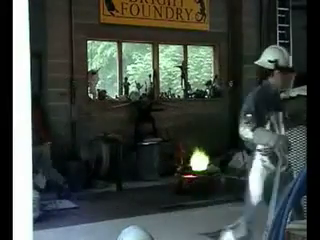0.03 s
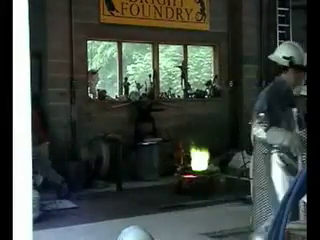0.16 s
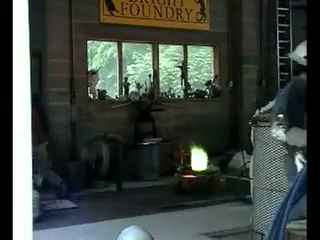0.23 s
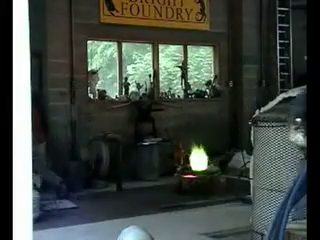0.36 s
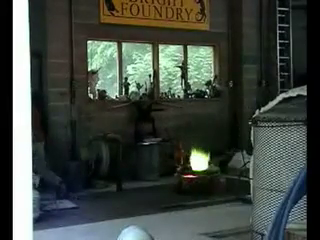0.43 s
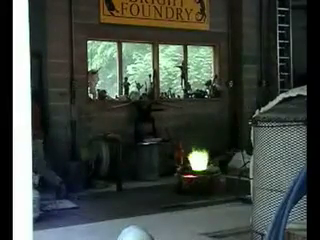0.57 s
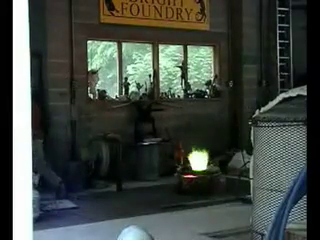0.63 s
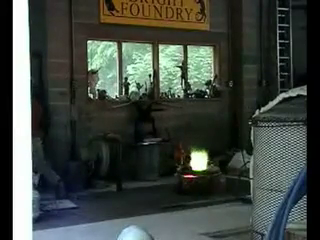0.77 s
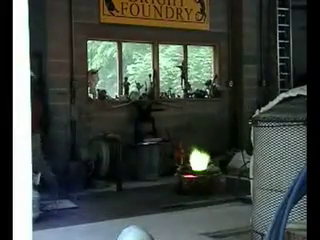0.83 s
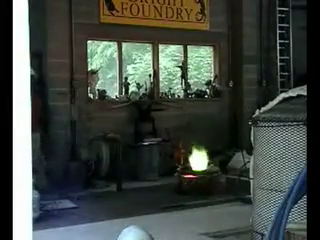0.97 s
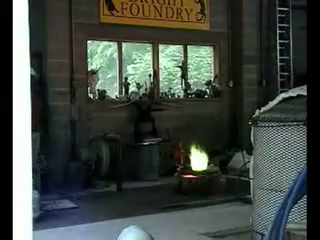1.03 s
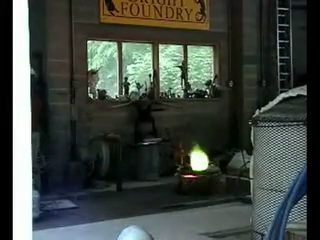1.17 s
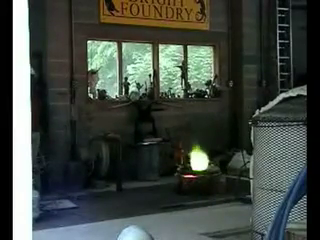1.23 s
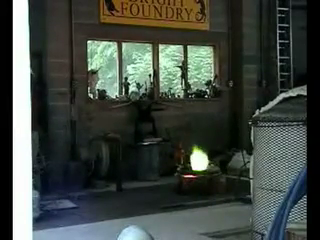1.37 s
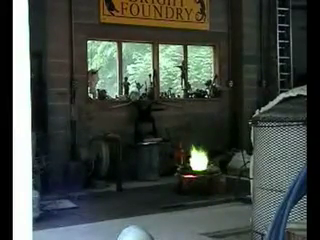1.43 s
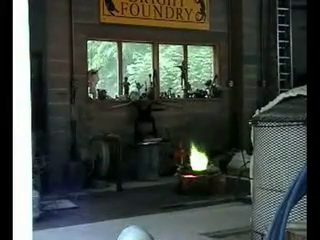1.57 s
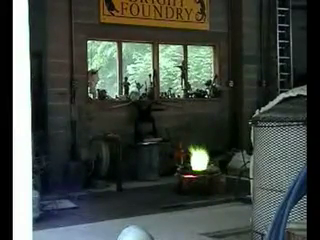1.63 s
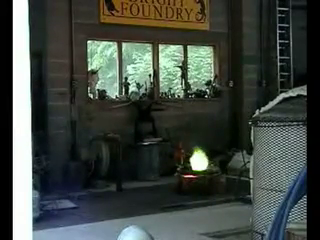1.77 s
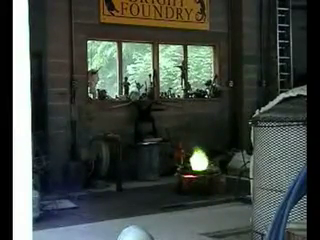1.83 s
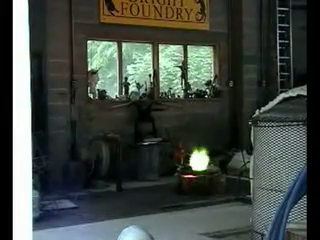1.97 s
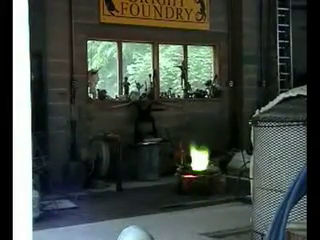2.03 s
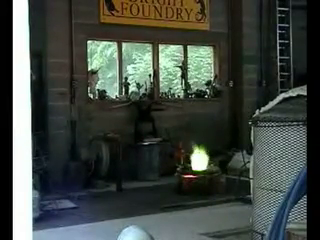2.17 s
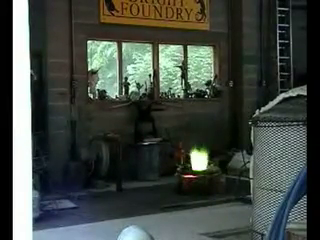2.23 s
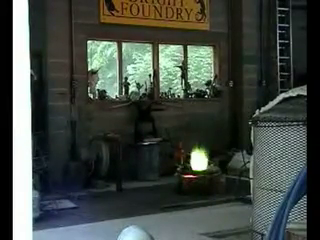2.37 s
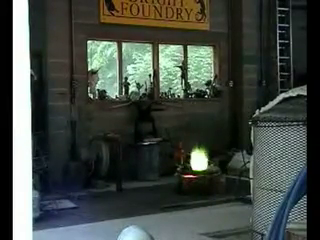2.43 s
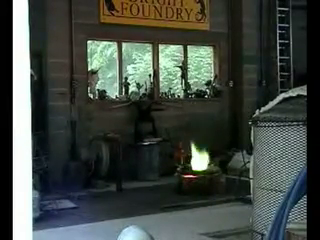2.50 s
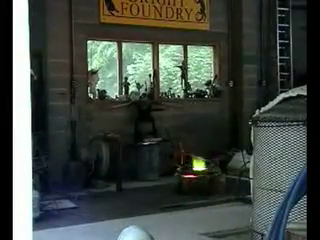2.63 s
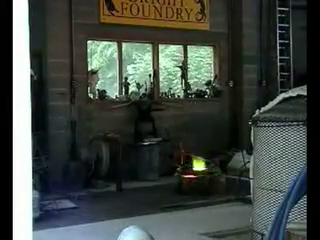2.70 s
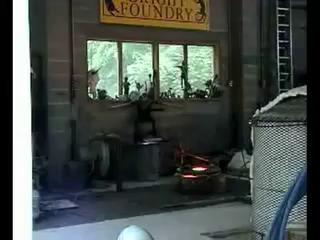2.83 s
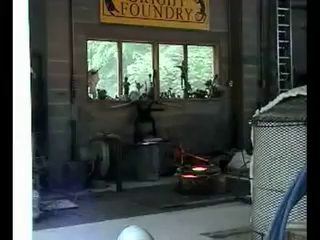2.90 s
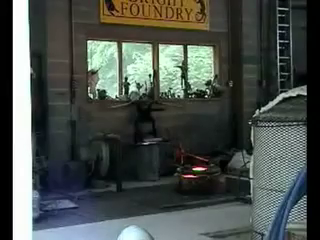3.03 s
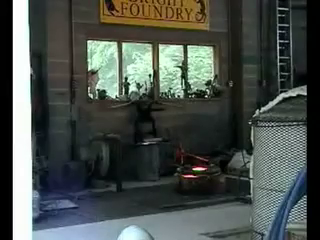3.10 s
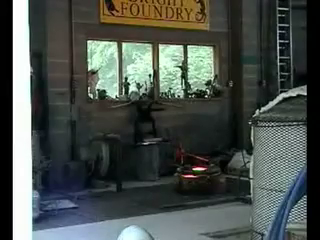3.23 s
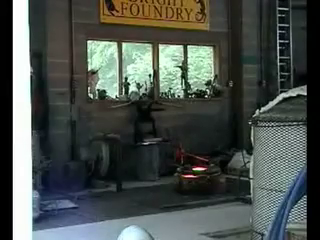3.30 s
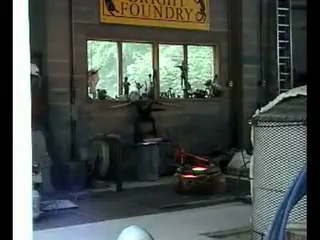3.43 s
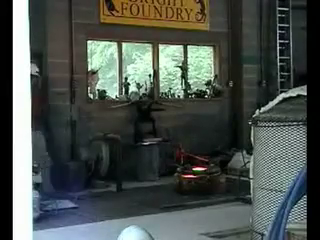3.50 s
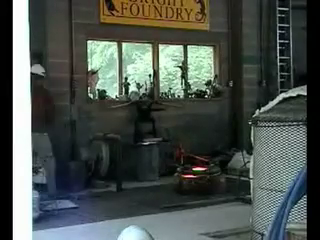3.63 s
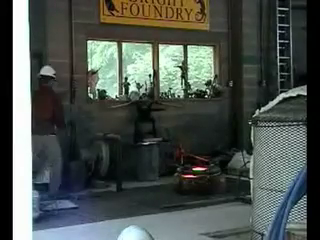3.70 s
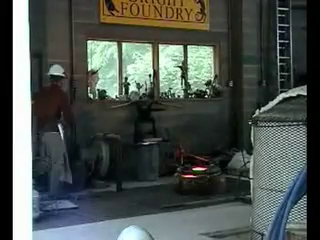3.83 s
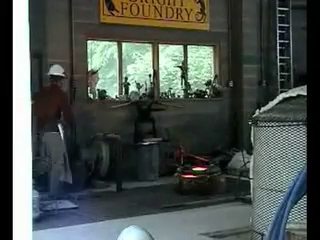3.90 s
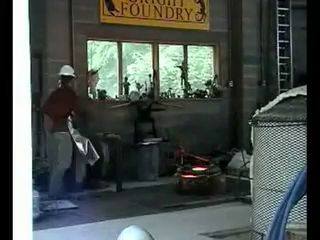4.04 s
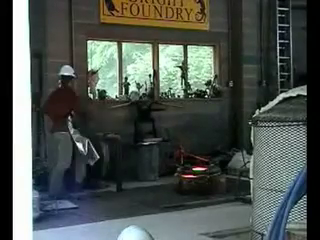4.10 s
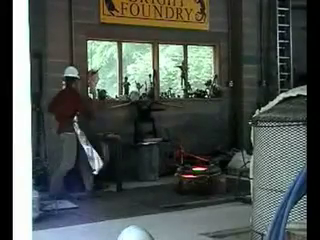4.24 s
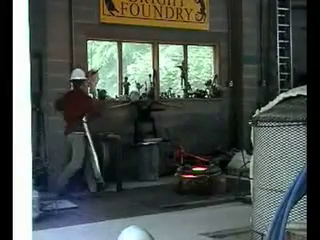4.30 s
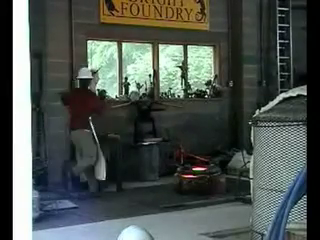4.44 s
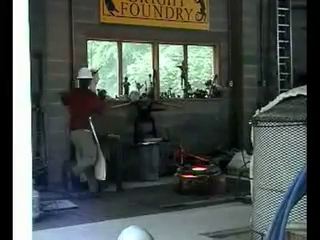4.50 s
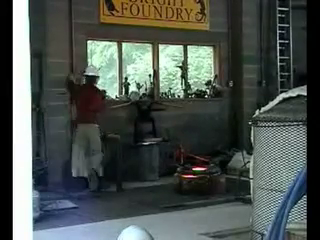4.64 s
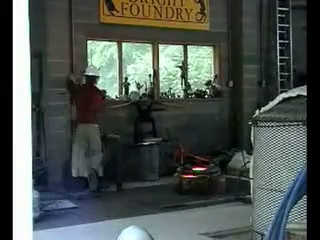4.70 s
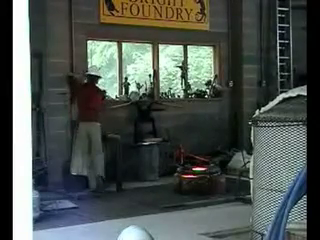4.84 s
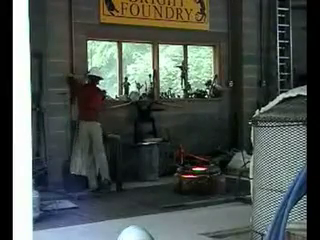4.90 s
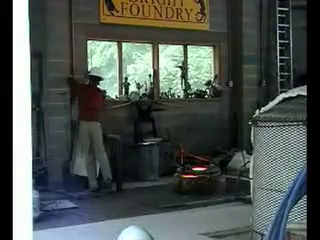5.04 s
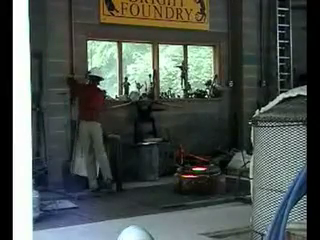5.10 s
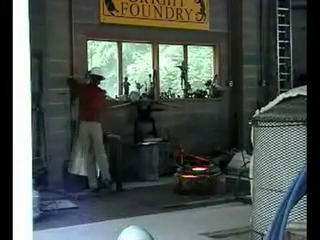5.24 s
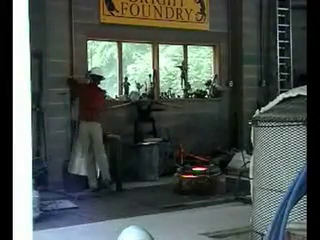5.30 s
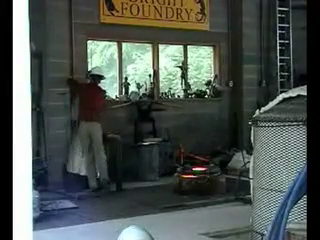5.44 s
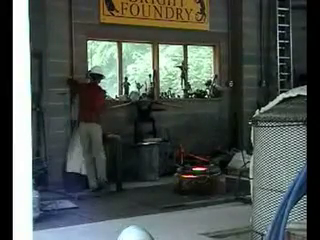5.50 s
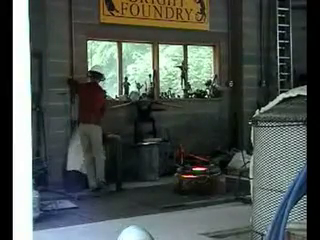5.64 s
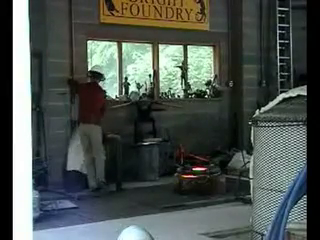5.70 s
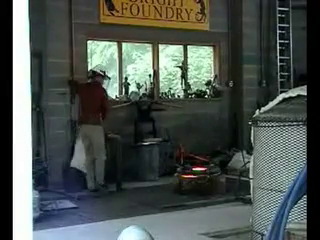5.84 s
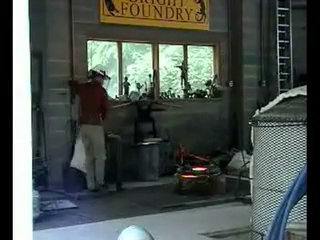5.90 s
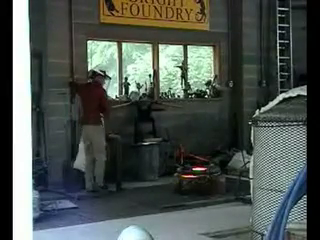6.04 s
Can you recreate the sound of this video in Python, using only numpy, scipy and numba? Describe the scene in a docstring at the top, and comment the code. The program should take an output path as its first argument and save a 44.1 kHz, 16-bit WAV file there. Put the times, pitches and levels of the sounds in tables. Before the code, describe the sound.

Inside a hard-walled metal workshop, a gas furnace roars low and thick, clipping a small dull microphone. A steel tool scrapes in three quick strokes, then the gas is shut and the roar dies within a second. A blower's whine and rushing air carry on, with faint shuffling and motor hum, until its pitch starts to slide down at the end.

```python
"""A gas burner roars in a crucible furnace inside a block-walled shop until the gas is shut at 2.7 s.
The air blower whines on; near the end its motor is cut and it starts to run down.
Roar is flickering noise plus chamber resonances; the blower is drifting tones, air noise and a humming casing.
A steel tool scrapes nearby, boots and cloth shuffle, a second motor hums and a low rumble comes up.
A small microphone chain rides its gain, cuts the treble and clips on the roar."""
import sys
import numpy as np
from scipy import signal
from scipy.fft import rfft, irfft, next_fast_len
from scipy.io import wavfile
from scipy.ndimage import uniform_filter1d
from numba import njit

SR = 44100
rng = np.random.default_rng(int(sys.argv[2]) if len(sys.argv) > 2 else 0)


def how_loud(loudness_db):
    """Turn decibels into a plain amplitude multiplier (0 dB gives 1, 20 dB gives 10)."""
    steps = np.asarray(loudness_db, float) / 20
    return 10 ** steps


def file_out(sig):
    """Save sig as 16-bit WAV at sys.argv[1]."""
    # one column per channel
    cols = np.atleast_2d(sig).T
    # limit, then scale
    lim = np.clip(cols, -1, 1)
    pcm = np.round(lim * 32767).astype(np.int16)
    wavfile.write(sys.argv[1], SR, pcm)


N = 267246

# broad roar of the flame, before its burn gain: pitch_hz, level_db (per Hz)
FLAME_COLOUR = [(25, -55), (90, -53), (130, -33.5), (230, -33.5), (400, -37.5), (800, -53.5), (1500, -68),
                (3000, -61), (5000, -77.5)]
# furnace chamber and shop resonances, before the burn gain: pitch_hz, width_hz, level_db (rms)
CHAMBER_MODES = [(109.9, 5.1, -20.5), (122.7, 10, -11.5), (153.1, 20, -8.5), (168.8, 8.5, -5.5),
                 (188.4, 35, -11.5), (203.86, 11.4, -8.5), (261.4, 17, -22.5), (295.4, 7.3, -16.5),
                 (336.7, 18, -19.5), (355, 6.8, -19), (383.6, 13, -21.5), (510, 3.7, -27),
                 (591.5, 23, -24.5), (725, 59, -18), (1044, 46, -33), (1478, 98, -30)]
BURN_DB = 1  # heat release
SHUT_S, SHOP_T60_S = 2.677, 0.87  # the valve shuts; the roar then falls 60 dB in this time

# whine of the blower at full speed, in two groups: pitch_hz, level_db (re the whine)
LOWER_WHINE = [(716, -1), (728, -7)]
UPPER_WHINE = [(762, 0), (776.4, -11), (666, -12)]
# each whine swells once: usual_db, swell_db, peak_s, half_length_s, change_db (per % of speed lost)
LOWER_WHINE_SWELL = (-26.5, 9, 3.5, 1, 1)
UPPER_WHINE_SWELL = (-28, 6, 5.5, 2, -1.2)
# bearing and gear tones at full speed, before the air load: pitch_hz, level_db (rms)
BEARING_TONES = [(961, -42.5), (1453, -39.5), (1499, -43.5), (1548, -54.5), (1817, -45.5), (1850, -43.5),
                 (1935, -44), (1968, -44), (1992, -40), (2003, -43.5), (2191, -57.5), (2237, -63),
                 (2484, -45.5), (2546, -46), (2684, -44.5), (2729, -40), (3093, -51), (3117, -51.5),
                 (3252, -61), (3276, -47.5), (3297, -50), (3421, -57.5), (3669, -45.5), (3714, -43),
                 (3760, -36), (3959, -49.5), (4027, -49.5), (4161, -43.5), (4204, -46), (4390, -50)]
# colour of the rushing air, of which only the shape counts: pitch_hz, level_db (per Hz)
AIR_COLOUR = [(15, -60.5), (25, -21), (118, -7), (226, -7), (646, -6.5), (736, -8.5), (876, -15.5),
              (1220, -15.5), (1450, -19.5), (1610, -20), (1960, -19), (3460, -22), (3780, -17.5),
              (4600, -26), (5980, -57), (10100, -120)]
AIR_DB = -20  # rms of the rushing air before the air load
# casing resonances, before the air load: pitch_hz, width_hz, level_db (rms)
CASING_MODES = [(116, 25, -33.5), (1413, 190, -37), (1954, 220, -38), (3758, 98, -35)]
LOAD_DB, LOAD_SAG_DB_PER_S = 0.75, 0.38  # air load of the blower, easing slowly
CUT_S = 5.68  # the motor is cut
RUNDOWN_SHARE, RUNDOWN_BEND = 0.32, 1.6  # share of speed lost 1 s after the cut; power of time, gathering pace
HOT_WAVER_RAD = 0.95  # extra phase wander of the whine through the burning gas

# modes of the scraped steel, before they are widened and trimmed: pitch_hz, width_hz, level_db
STEEL_MODES = [(1320, 31, -5), (1460, 31, -8), (1930, 36, -6), (2270, 37, -10), (2640, 37, 0),
               (2850, 23, -7), (3430, 47, -2), (3740, 58, -9), (3920, 85, -13), (4300, 30, -6)]
# strokes of steel dragged over the floor:
# peak_s, half_length_s, pressure_db, brightness_db (per octave)
SCRAPE_STROKES = [(2.123, 0.052, -23.5, -5), (2.238, .055, -18.5, 1), (2.332, .04, -21.5, 3)]
# shuffles of boots and cloth: peak_s, half_length_s, level_db, centre_hz
SHUFFLE_SWELLS = [(0.235, 0.038, -23, 2000), (0.723, 0.066, -28.5, 2460), (1.769, 0.14, -24.5, 1800),
                  (3.859, 0.1, -27.5, 2500), (4.492, 0.11, -29, 2200)]
# hum of a second motor at its own speed: pitch_hz, level_db (rms)
NEIGHBOUR_TONES = [(119, -31), (1208, -37), (1219, -41.5), (1254, -53), (1273, -49), (1418, -45.5),
                   (1429, -41)]
RUMBLE_DB, RUMBLE_RISE_DB = -44, 7  # level before the rise, and the rise
RUMBLE_S, RUMBLE_RISE_S = 5.4, 0.2  # middle of the rise and its time scale


def seconds():
    """Time of every sample."""
    return np.arange(N) / SR


def swell(peak_s, half_length_s):
    """A bell-shaped rise and fall, 1 at its peak."""
    return np.exp(-((seconds() - peak_s) / half_length_s) ** 2)


def unit(x):
    """Scale to rms 1."""
    return x / np.sqrt(np.mean(x ** 2))


def walk(rate):
    """Random levels held 1 / rate s and slewed twice; spread near 1."""
    hold = int(SR / rate)
    steps = np.repeat(rng.standard_normal(N // hold + 1), hold)
    slewed = uniform_filter1d(uniform_filter1d(steps, hold), hold)
    return 1.32 * slewed[:N]


def ring(x, hz, width):
    """A steep-skirted resonance driven by x, rms 1."""
    # each of the two passes is broader, as the pair narrows the peak
    b, a = signal.iirpeak(hz, hz / (1.5 * width), fs=SR)
    return unit(signal.lfilter(b, a, signal.lfilter(b, a, x)))


def resonances(modes):
    """A bank of resonances, each shaken by its own noise."""
    return sum(how_loud(db) * ring(rng.standard_normal(N), hz, width) for hz, width, db in modes)


def turbulence(colour, flicker_db, rate):
    """Noise of a given colour in half-octave bands, each flickering on its own."""
    size = next_fast_len(N)
    hz = np.maximum(np.arange(size // 2 + 1) * SR / size, 1)
    at, db = np.transpose(colour)
    density = how_loud(np.interp(np.log(hz), np.log(at), db))
    coloured = rfft(rng.standard_normal(size)) * density * np.sqrt(SR / 2)
    place = np.clip(2 * np.log2(hz / 25), 0, 15)  # half octaves above 25 Hz
    total = np.zeros(N)
    for k in range(16):
        crossfade = np.cos(np.pi / 2 * np.clip(place - k, -1, 1)) ** 2
        band = irfft(coloured * crossfade, size)[:N]
        total += band * how_loud(flicker_db * walk(rate))
    return total


def tone(hz, turns, waver, flicker_db):
    """A near-steady tone of rms about 1 that follows turns, its phase (radians) and level drifting."""
    phase = 2 * np.pi * (hz * turns + rng.random()) + waver * walk(6)
    return np.sqrt(2) * np.sin(phase) * how_loud(flicker_db * walk(2.88))


def burning():
    """Gain of the flame: steady, then dying away after the valve shuts."""
    return how_loud(-60 * np.maximum(seconds() - SHUT_S, 0) / SHOP_T60_S)


def flame():
    """Unsteady burning shakes the chamber modes over a broad roar that surges."""
    modes = resonances(CHAMBER_MODES)
    roar = how_loud(1.1 * walk(10)) * turbulence(FLAME_COLOUR, flicker_db=2.0, rate=9)
    return how_loud(BURN_DB + 1.1 * walk(5)) * burning() * (modes + roar)


def whine_group(lines, swelling, turns, slip):
    """Whine tones that swell once, waver through hot gas and glide as speed is lost."""
    usual_db, swell_db, peak_s, half_length_s, change_db = swelling
    waver = 0.59 + HOT_WAVER_RAD * burning() + 70 * slip
    level_db = usual_db + swell_db * swell(peak_s, half_length_s)
    total = np.zeros(N)
    for hz, db in lines:
        # gliding tones cross the standing waves of the shop and break up
        breakup_db = 2.5 * np.minimum(walk(25), 0)
        gain = how_loud(level_db + db + 100 * slip * (change_db + breakup_db))
        total += gain * tone(hz, turns, waver, flicker_db=0.64)
    return total


def blower():
    """Shaft-locked whine and bearing tones, rushing air and a humming casing."""
    slip = RUNDOWN_SHARE * np.maximum(seconds() - CUT_S, 0) ** RUNDOWN_BEND  # share of speed lost
    turns = np.cumsum(1 - slip) / SR  # time as the slowing shaft counts it
    whine = (whine_group(LOWER_WHINE, LOWER_WHINE_SWELL, turns, slip)
             + whine_group(UPPER_WHINE, UPPER_WHINE_SWELL, turns, slip))
    bearings = sum(how_loud(db) * tone(hz, turns, waver=0.9, flicker_db=2.0) for hz, db in BEARING_TONES)
    air = how_loud(AIR_DB) * unit(turbulence(AIR_COLOUR, flicker_db=1.0, rate=7))
    casing = resonances(CASING_MODES)
    load = how_loud(LOAD_DB - LOAD_SAG_DB_PER_S * seconds())
    # slowing down, the bearing tones slide off the casing resonances and fade
    return whine + load * (how_loud(-110 * slip) * bearings + air + casing)


def scrape():
    """Stick-slip grains ring the steel; faster rubbing wakes the higher modes."""
    grains = rng.standard_normal(N) * how_loud(1.6 * walk(55))
    modes = [(hz, how_loud(db - 1.5) * ring(grains, hz, 1.6 * width)) for hz, width, db in STEEL_MODES]
    hiss = how_loud(-4.0) * ring(grains, 3000, 2700)
    total = np.zeros(N)
    for peak_s, half_length_s, pressure_db, brightness in SCRAPE_STROKES:
        steel = sum(how_loud(brightness * np.log2(hz / 2600)) * mode for hz, mode in modes)
        total += how_loud(pressure_db) * swell(peak_s, half_length_s) * (hiss + steel)
    return total


def shuffles():
    """Soft broad swells of friction noise from boots and cloth."""
    return sum(how_loud(db) * swell(peak_s, half_length_s) * ring(rng.standard_normal(N), hz, 1.4 * hz)
               for peak_s, half_length_s, db, hz in SHUFFLE_SWELLS)


def neighbour():
    """Tones of another motor that holds its own speed."""
    return sum(how_loud(db) * tone(hz, seconds(), waver=0.5, flicker_db=1.2) for hz, db in NEIGHBOUR_TONES)


def rumble():
    """A narrow low drone of resonant noise that comes up late."""
    rise = (1 + np.tanh((seconds() - RUMBLE_S) / RUMBLE_RISE_S)) / 2
    return how_loud(RUMBLE_DB + RUMBLE_RISE_DB * rise) * ring(rng.standard_normal(N), 51, 9.1)


def scene():
    """Everything reaches one microphone."""
    return (flame() + blower() + scrape() + shuffles() + neighbour() + rumble())[None]


@njit
def follow(power, start, attack, release):
    """Level follower: quick up, slow down."""
    level, out = start, np.empty(len(power))
    for i in range(len(power)):
        level += (power[i] - level) * (attack if power[i] > level else release)
        out[i] = level
    return out


def ride_gain(x):
    """Gain control that partly evens the level, quick to duck and slow to recover."""
    power = uniform_filter1d(x[0] ** 2, size=2048)
    attack_s, release_s = 0.036, 0.6
    heard = follow(power, power[:SR].max(), 1 / (attack_s * SR), 1 / (release_s * SR))
    return x * (how_loud(-13.0) ** 2 / heard) ** 0.18


def clip(x, ceiling, knee):
    """Overload that flattens peaks at the ceiling; a higher knee bends more sharply."""
    return x / (1 + np.abs(x / ceiling) ** knee) ** (1 / knee)


def cut_treble(x):
    """A steep treble cut, with its highest band flickering and dropping out for moments."""
    top_hz, flicker_from_hz = 4560, 3950
    x = signal.sosfiltfilt(signal.ellip(10, 0.2, 50, top_hz, fs=SR, output="sos"), x)
    body = signal.sosfiltfilt(signal.butter(6, flicker_from_hz, fs=SR, output="sos"), x)
    return body + (x - body) * how_loud(np.minimum(14 * (walk(45) + 0.83), 0))


def roll_off(x):
    """The treble ends steeply here."""
    return signal.sosfilt(signal.butter(12, 15870, fs=SR, output="sos"), x)


def record(dry):
    """Gain control, a steep treble cut, overload, then a presence lift."""
    x = ride_gain(dry)
    x = clip(x, ceiling=0.94, knee=3.66)  # the capsule squeezes the loudest swings
    x = cut_treble(x)
    # the preamp rounds, the converter clips; both splash above the treble cut
    x = clip(x, ceiling=0.88, knee=8.4)
    x = clip(x, ceiling=0.63, knee=120)
    # a coupling filter tilts the flat tops
    x = signal.sosfilt(signal.butter(1, 22, "highpass", fs=SR, output="sos"), x)
    # the presence lift ripples the flattened peaks
    presence = signal.sosfiltfilt(signal.butter(1, 500, "highpass", fs=SR, output="sos"), x)
    mix = x + 0.35 * presence
    return roll_off(mix)


dry = scene()
out = record(dry)
file_out(out)
```